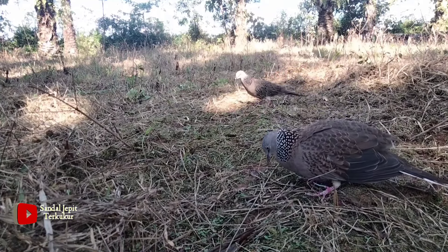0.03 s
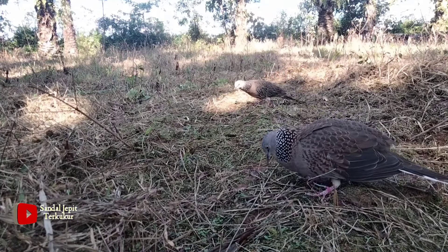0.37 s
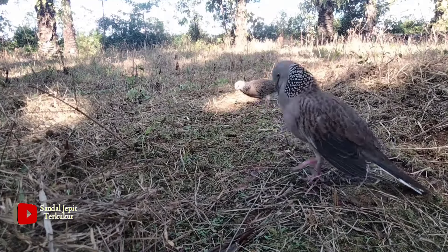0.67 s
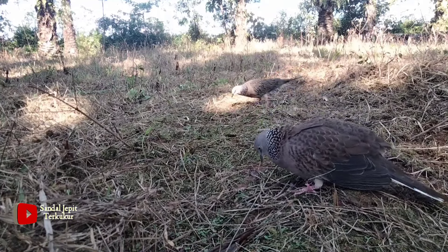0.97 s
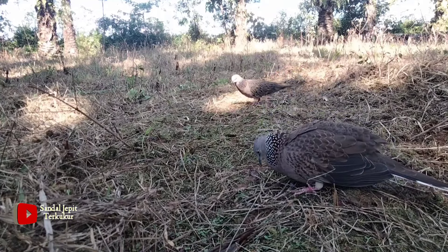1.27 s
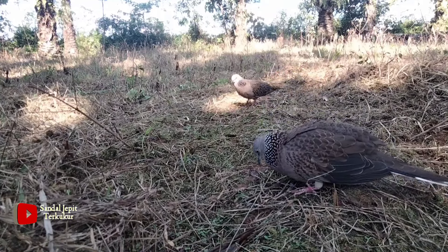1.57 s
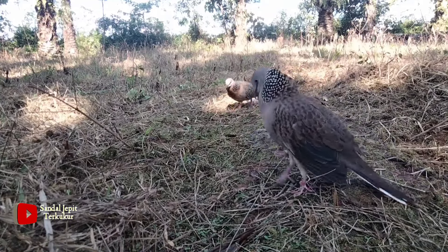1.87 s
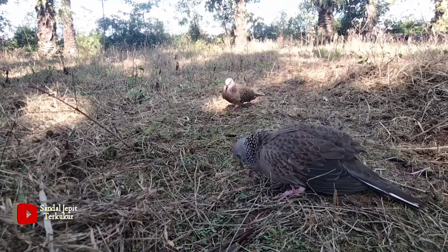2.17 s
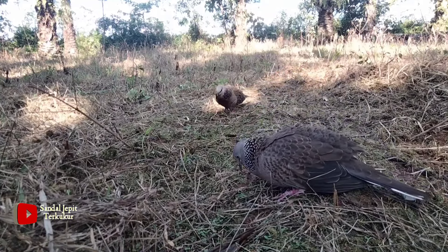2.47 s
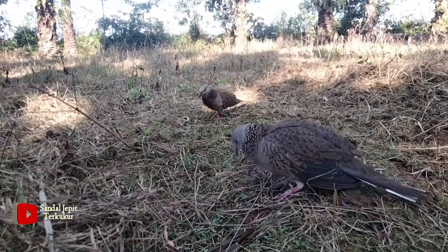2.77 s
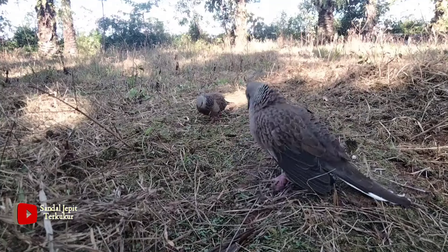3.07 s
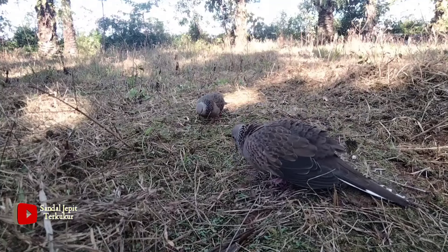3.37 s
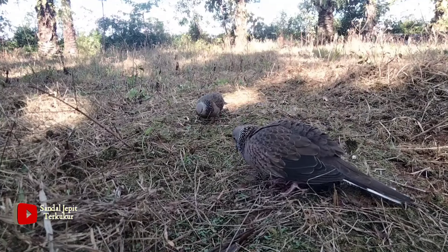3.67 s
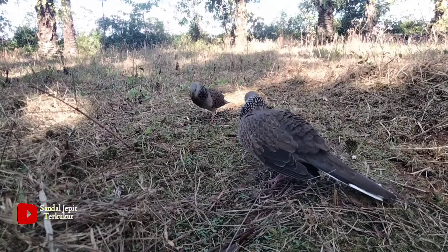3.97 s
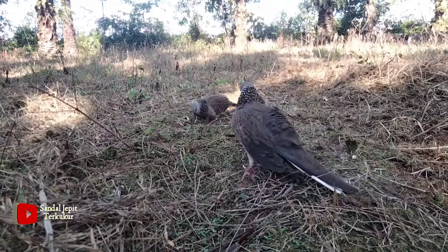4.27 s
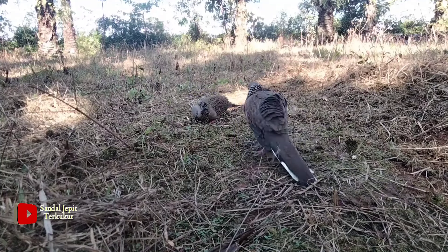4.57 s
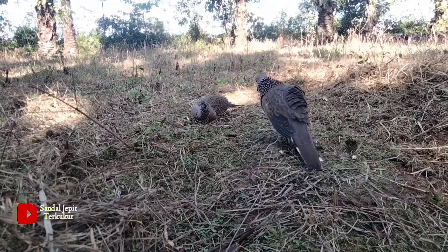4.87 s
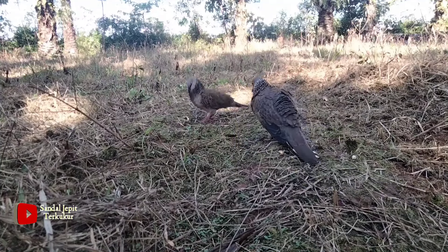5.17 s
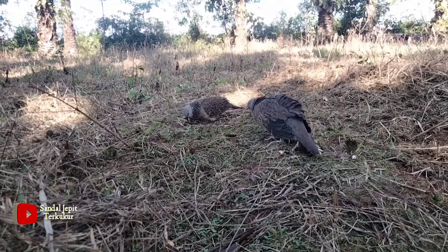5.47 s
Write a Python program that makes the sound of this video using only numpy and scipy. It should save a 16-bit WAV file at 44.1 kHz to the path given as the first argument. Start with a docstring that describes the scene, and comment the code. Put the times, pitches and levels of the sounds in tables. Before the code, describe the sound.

A dove coos close by in groups of low rolling notes, over a faint distant engine hum and far small birds.

```python
"""An open plantation: a spotted dove coos close by on dry grass, in groups of rolling notes.
Each coo is one low tone, amplitude-modulated into a fast trill; two long ones smooth out into a
falling whistle, and two soft nasal grunts come between the later coos. A distant engine hums at its
firing rate under still air and a thin high hiss. Dry stems tick in damped bursts of noise, and
small birds chirp far off, washed in the echo that the trees scatter back."""
import sys
import numpy as np
from scipy import signal
from scipy.fft import rfft, irfft
from scipy.io import wavfile
from scipy.ndimage import uniform_filter1d

SR = 44100
rng = np.random.default_rng(int(sys.argv[2]) if len(sys.argv) > 2 else 0)


def store_pcm(level_fs):
    """Save levels as 16-bit WAV."""
    pcm = np.round(np.clip(level_fs, -1, 1) * 32767).astype(np.int16)
    wavfile.write(sys.argv[1], SR, np.atleast_2d(pcm).T)


N = 252693
TIME = np.arange(N) / SR
BIN_HZ = np.arange(N // 2 + 1) * SR / N


def from_db(db):
    """Amplitude grows tenfold for every 20 dB."""
    return 10 ** (np.asarray(db) / 20)


def unit_rms(x):
    """Division by the root mean square gives unit power."""
    return x / np.sqrt(np.mean(x ** 2) + 1e-20)


def coloured(x, spectrum):
    """Spectral shaping by a normalised gain curve: white noise keeps its power."""
    hz, db = np.transpose(spectrum)
    gain = from_db(np.interp(np.log(BIN_HZ + 1), np.log(hz), db))
    return irfft(rfft(x) * unit_rms(gain), N)


def noise(spectrum):
    """Filtered white noise takes on the filter's spectrum, here at unit power."""
    return unit_rms(coloured(rng.standard_normal(N), spectrum))


def drift(corner_hz):
    """Low-passed noise is a random wander, here of unit spread."""
    return unit_rms(irfft(rfft(rng.standard_normal(N)) / (1 + (BIN_HZ / corner_hz) ** 2) ** 2, N))


def phase_of(hz):
    """Phase, in radians, is the time integral of angular frequency."""
    return 2 * np.pi * np.cumsum(hz) / SR


def fade(t, start, end, edge_s):
    """A tapered window: one from start to end, with raised-cosine flanks outside."""
    return np.sin(np.pi / 2 * np.clip(np.minimum(t - start, end - t) / edge_s + 1, 0, 1)) ** 2


def step(t, centre, length):
    """A raised-cosine transition from zero to one."""
    return .5 + .5 * np.sin(np.pi * np.clip((t - centre) / length, -.5, .5))


# Whistled endings of the long coos:
# (onset [s], first pitch [Hz], last pitch [Hz], level at resonance [dB], trill depth [0-1])
WHISTLES = [(3.948, 596.4, 567, -22, 0.51), (4.872, 695.4, 550.4, -19.5, 0.24)]


def whistle(t, start, end, hz, level_db, depth, throat_hz=641, bandwidth_hz=118):
    """Resonance: a long coo smooths into a falling tone, louder the nearer it is to the throat's peak."""
    for onset, first_hz, last_hz, peak_db, trill_left in WHISTLES:
        if start < onset < end:
            progress = np.clip((t - onset) / (end - onset), 0, 1) ** 1.2   # the fall comes late
            glide_hz = first_hz + (last_hz - first_hz) * step(progress, 0.48, 0.83)
            glide_db = peak_db - 10 * np.log10(1 + (2 * (glide_hz - throat_hz) / bandwidth_hz) ** 2)
            share = step(t, onset, 0.03)
            hz = hz + share * (glide_hz - hz)
            level_db = level_db + share * (glide_db - level_db)
            depth = depth + share * (trill_left - depth)
    return hz, level_db, np.clip(depth, 0, 1)


def coo_contour(t, start, crest, end, crest_db, swell_db, crest_hz, rise_hz, merging, soft_s):
    """Pitch and level follow vocal effort, which swells to a crest and then relaxes."""
    ease_hz_per_s, ease_db_per_s = 520, 35.5
    to_go = np.clip((crest - t) / (crest - start), 0, 1)
    past_s = np.maximum(t - crest, 0)
    soft = (soft_s > 0) * (1 - step(t, start + soft_s, .02))   # a soft opening breaks into full voice
    scoop_hz = 59 * np.exp(-np.maximum(t - start, 0) / 0.021)   # every coo scoops up to its pitch
    hz = crest_hz - rise_hz * to_go - ease_hz_per_s * past_s - 5.6 * soft - scoop_hz
    level_db = crest_db - swell_db * to_go - ease_db_per_s * past_s - 3.5 * soft
    depth = 1 - merging * np.exp(-((t - crest) / .06) ** 2)
    return whistle(t, start, end, hz, level_db, depth)


def trill(t, phase, rate, unevenness, depth, width=0.31, bend=0.37, squash=0.52):
    """Amplitude modulation: the tone comes in short swells, each starting afresh, so its phase slips."""
    jitter, scatter, shimmer, bending = rng.standard_normal((100, 4)).T
    beats = t[0] + np.cumsum(1 + np.clip(.15 * unevenness * jitter, -.5, .5)) / rate
    broken = np.interp(beats, t, depth)
    slip = -np.diff(np.interp(beats, t, phase), prepend=0) + 1.7 * unevenness * scatter
    offset = np.cumsum(np.angle(np.exp(1j * slip)) * broken)
    tone = np.zeros(len(t), complex)
    for k in np.flatnonzero(beats < t[-1]):
        # swells widen and merge as the trill fades; each bends a little in pitch
        age = (t - beats[k]) * rate / width ** broken[k]
        near = np.abs(age) < 3
        size = from_db(8.5 * unevenness * broken[k] * shimmer[k])
        sweep = bend * broken[k] * bending[k]
        tone[near] += size * np.exp(1j * offset[k] - age[near] ** 2 * (1 + 1j * sweep))
    # the membrane's swing saturates, so the crests come out alike
    tone = tone / (np.abs(tone) ** 2 + 0.13) ** (squash / 2)
    span = int(2 * SR / rate)
    power = uniform_filter1d(uniform_filter1d(np.abs(tone) ** 2, span), span)
    return tone / np.sqrt(np.abs(power) + 1e-4) * np.exp(1j * phase)


# The dove's notes: (start [s], crest [s], end [s], crest level [dB], swell to crest [dB],
# crest pitch [Hz], rise to crest [Hz], trill rate [Hz], unevenness [0-1],
# merging of the trill at the crest [0-1], soft opening [s])
COOS = [ (-0.02, 0.145, 0.16, -17, 4, 672, 3.5, 121, 0.21, 0, 0),
        (0.258, 0.554, 0.63, -15, 3.5, 701, 6.5, 113.3, .35, .12, 0.0025),
        (0.949, 1.098, 1.118, -18.5, 6, 676, 11, 116, 0.43, 0.01, 0.00097),
        (1.227, 1.414, 1.42, -17, 4, 684.4, 17, 116.5, 0.34, 0, 0),
        (1.5, 1.759, 1.814, -15, 3, 701, 6, 124.6, .38, 0.24, 0.0053),
        (2.146, 2.265, 2.288, -19, 7, 673.8, 4.5, 105.65, 0.34, 0, 0),
        (2.396, 2.619, 2.632, -17.5, 3.5, 695, 35, 113, 0.32, 0, 0),
        (2.689, 2.844, 2.932, -15.5, 1, 690.4, -3, 107, 0.6, .22, 0),
        (3.168, 3.371, 3.421, -18.5, 10.5, 660, 54.5, 116, .5, 0, 0.099),
        (3.524, 3.815, 4.068, -13.5, 2, 697.2, 40, 117.2, .6, 0.15, .17),
        (4.309, 4.455, 4.512, -21.5, 4.5, 645, 17.5, 120, 0.41, 0.16, 0),
        (4.637, 4.813, 5.13, -21, 2, 696, 70.5, 120.55, 0.85, 0.22, 0.011),
        (5.385, 5.652, 5.669, -18.5, 5.5, 674, 49, 107, 0.32, 0.02, 0.14),
        (5.708, 5.79, 5.85, -22, 3, 673, 9, 107, 0.1, 0.03, 0), ]
# Overtones of the voice: (harmonic number [1], level re fundamental [dB])
OVERTONES = [(2, -46.5), (3, -59), (4, -61)]
# Spectrum of the rasp: (frequency [Hz], relative level [dB])
RASP_SPECTRUM = [(150, -29), (330, -9.5), (520, 0.5), (1000, 6.5), (1330, -2), (1560, -30), (2100, -30),
                 (5000, -52.5)]


def dove_coos(attack_s=0.015, release_s=.007, sag_hz=52, sag_db=5, rasp_db=-25):
    """Source and filter: the swollen throat passes the fundamental, faint overtones and a little rasp."""
    voice, hoarse = np.zeros((2, N))
    breath = rng.standard_normal(N)
    for start, crest, end, *effort, rate, unevenness, merging, soft_s in COOS:
        on = (TIME > start - .03) & (TIME < end + .04)
        t = TIME[on]
        hz, level_db, depth = coo_contour(t, start, crest, end, *effort, merging, soft_s)
        # pressure is low at both ends of a note: pitch and level sag and the rasp dies
        slack = depth * np.minimum(np.exp((start - t) / attack_s) + np.exp((t - end) / release_s), 2)
        tone = trill(t, phase_of(hz - sag_hz * slack), rate, unevenness, depth)
        swells, phase = np.abs(tone), np.angle(tone)
        envelope = from_db(level_db - sag_db * slack) * fade(t, start, end, edge_s=0.014)
        wave = np.cos(phase) + sum(from_db(db) * np.cos(k * phase) for k, db in OVERTONES)
        voice[on] += np.sqrt(2) * envelope * swells * wave
        # the rasp: a small flap between swells and air during them
        flaps = np.zeros(len(t))
        flaps[signal.argrelmin(swells)[0]] = np.sqrt(SR / rate)
        rasp = from_db(-1.5) * depth * flaps + from_db(-6) * swells * breath[on]
        fullness = from_db(0.52 * np.minimum(level_db + 19, 0))   # soft notes are cleaner
        hoarse[on] += rasp * envelope * depth * np.exp(-0.73 * slack) * fullness
    throat = signal.butter(4, 483, "high", fs=SR, output="sos")
    return signal.sosfilt(throat, voice) + from_db(rasp_db) * coloured(hoarse, RASP_SPECTRUM)


# Course of the engine's hum: (time [s], firing rate [Hz], level [dB])
ENGINE = [(0.0, 52.4, -43), (0.09, 54.84, -47), (0.7, 54.8, -46), (1.13, 54.4, -54), (1.24, 54.4, -51),
          (1.45, 52.64, -45), (1.95, 53.26, -52), (2.03, 52.1, -63), (2.49, 51.6, -48.5),
          (3.02, 51.8, -53.5), (3.8, 50.4, -43.5), (5.73, 49.9, -44.5)]


def engine(throb=0.055, throb_hz=22):
    """Low frequencies carry farthest: only the firing tone arrives. Returns the hum and its level."""
    times, rates, levels = np.transpose(ENGINE)
    hz = np.interp(TIME, times, rates)
    level_db = np.interp(TIME, times, levels)
    swing = 1 + throb * (drift(throb_hz) + 1j * drift(throb_hz))
    hum = np.sqrt(2) * from_db(level_db) * np.real(swing * np.exp(1j * phase_of(hz)))
    return hum, level_db


# Spectrum of still outdoor air: (frequency [Hz], relative level [dB])
AIR_SPECTRUM = [(15, 2.5), (45, 1.5), (65, 4), (90, -6), (200, -13.5), (500, -20), (1000, -25), (2200, -30),
                (4500, -29.5), (6300, -32.5), (15500, -38.5)]
# Spectrum of the thin high hiss: (frequency [Hz], relative level [dB])
HISS_SPECTRUM = [(6000, -34.5), (6700, -10.5), (7100, 1.5), (7500, 2), (7850, -7), (8300, 0.5), (8650, -1),
                 (9300, -5.5), (10800, -15), (12800, -15), (14300, -6.5), (15500, -3)]


def air(hum_db, follow=0.31):
    """Ambient noise: two continuous spectra that swell and dip a little with the hum."""
    swell = from_db(follow * (hum_db - hum_db.mean()))
    return swell * (from_db(-51) * noise(AIR_SPECTRUM) + from_db(-57) * noise(HISS_SPECTRUM))


# Ticks of dry stems: (time [s], crackle level [dB], time to decay by 60 dB [s], woody snap [0-1])
TICKS = [(0.783, -43.5, 0.025, 0.1), (1.111, -50.5, 0.027, 0), (3.131, -53.5, 0.044, .1),
         (3.14, -43, 0.031, 0.11), (3.32, -50, 0.066, 0), (3.78, -52.5, 0.022, 0.8),
         (4.272, -45, .02, 0.56), (4.368, -41.5, 0.012, 0.23)]
# Spectrum of the bright crackle: (frequency [Hz], relative level [dB])
CRACKLE_SPECTRUM = [(2000, -28.5), (6500, -17.5), (8500, 7.5), (11000, -11), (15000, -13)]
# Spectrum of the woody snap: (frequency [Hz], relative level [dB])
SNAP_SPECTRUM = [(1500, -20.5), (4500, 3), (9000, -13)]


def dry_stems():
    """Exponential decay: grass cracks in brief bright bursts; thicker stems add a lower snap."""
    crackle, wood = noise(CRACKLE_SPECTRUM), noise(SNAP_SPECTRUM)
    out = np.zeros(N)
    for start, level_db, t60, snap in TICKS:
        envelope = from_db(level_db - 60 * np.maximum(TIME - start, 0) / t60) * (TIME >= start)
        out += envelope * (crackle + snap * wood)
    return out


# Calls of small far birds:
# (start [s], length [s], first pitch [Hz], last pitch [Hz], relative level [dB])
CHIRPS = [(1.274, 0.056, 5600, 5570, -67.5), (1.49, 0.11, 5920, 6900, -65.5), (1.71, 0.12, 3870, 4370, -59),
          (1.926, .04, 5030, 5300, -65), (2.075, 0.052, 5376, 5480, -68.5),
          (2.145, .027, 5770, 7100, -61.5), (2.338, 0.11, 3710, 4290, -60.5),
          (2.565, 0.078, 5210, 5220, -67)]


def small_birds(waver=.015, glide_share=.65):
    """Frequency modulation: thin, quivering whistles glide, mostly upward, and then hold."""
    out = np.zeros(N)
    quiver = 1 + waver * drift(160)
    for start, length, first_hz, last_hz, level_db in CHIRPS + twitter():
        on = (TIME > start) & (TIME < start + length)
        progress = (TIME[on] - start) / length
        glide = np.sin(np.pi / 2 * np.minimum(progress / glide_share, 1))
        hz = first_hz + (last_hz - first_hz) * glide
        envelope = from_db(level_db) * np.sqrt(2 * np.sin(np.pi * progress))
        out[on] += envelope * np.sin(phase_of(hz * quiver[on]))
    return out


# Soft nasal notes between coos:
# (start [s], length [s], first pitch [Hz], last pitch [Hz], resonance [Hz], level [dB])
GRUNTS = [(4.232, 0.05, 195.7, 165, 960, -41), (4.548, .05, 191.7, 160, 640, -41.5)]


def dove_grunts(half_width_hz=90, top_hz=1050, edge_s=0.0088):
    """Formant filtering: a short, falling harmonic series passes through one throat resonance."""
    out = np.zeros(N)
    for start, length, first_hz, last_hz, throat_hz, level_db in GRUNTS:
        on = (TIME > start) & (TIME < start + length)
        t = TIME[on]
        hz = first_hz + (last_hz - first_hz) * ((t - start) / length) ** 2
        note = np.zeros(len(t))
        for k in range(1, 8):
            resonance = 1 / (1 + 1j * (k * hz - throat_hz) / half_width_hz)
            rolloff = 1 / (1 + (k * hz / top_hz) ** 12)
            note += rolloff * np.real(resonance * np.exp(1j * k * phase_of(hz)))
        envelope = from_db(level_db) * fade(t, start + edge_s, start + length - edge_s, edge_s)
        out[on] += envelope * unit_rms(note)
    return out


def twitter(count=6, start=4.845, period_s=0.091, note_s=0.049, rise_hz=201):
    """Periodic repetition: rows of like chirps near one pitch, each a little fainter than the last."""
    pitches = 3470 + 25 * rng.standard_normal(count)
    return [(start + k * period_s, note_s, hz, hz + rise_hz, -64 - 2.1 * k)
            for k, hz in enumerate(pitches)]


def trees(x, t60, wet_db, build_s=0.14):
    """Scattering: trunks and foliage send back a diffuse tail that builds and decays."""
    t = TIME[:SR]
    tail = rng.standard_normal(SR) * from_db(-60 * t / t60) * (1 - np.exp(-t / build_s))
    tail /= np.sqrt(np.sum(tail ** 2))
    return x + from_db(wet_db) * signal.fftconvolve(x, tail)[:N]


def scene():
    """Direct-to-reverberant ratio falls with distance: the dove is almost dry, the far birds echo."""
    near = trees(dove_coos() + dry_stems() + dove_grunts(), t60=0.3, wet_db=-34.5)
    far = from_db(-2.0) * trees(small_birds(), t60=0.35, wet_db=1)
    hum, hum_db = engine()
    return (near + far + hum + air(hum_db))[None]


def record(dry, cutoff_hz=15480):
    """Band limiting: an elliptic low-pass cuts the top of the treble steeply."""
    return signal.sosfilt(signal.ellip(12, .1, 80, cutoff_hz, fs=SR, output="sos"), dry)


dry = scene()
out = record(dry)
store_pcm(out)
```